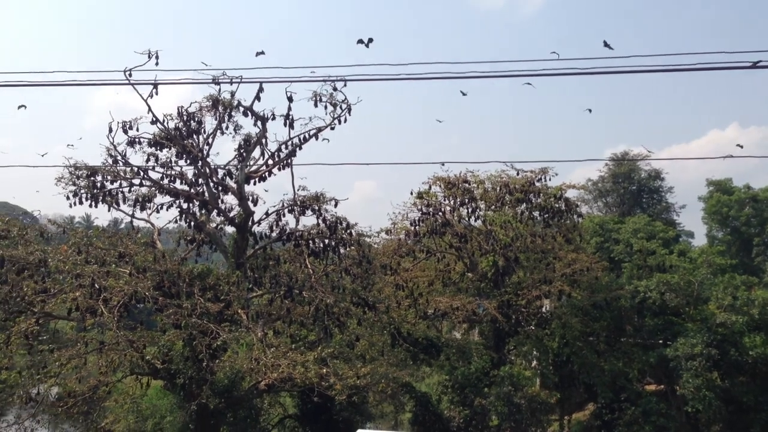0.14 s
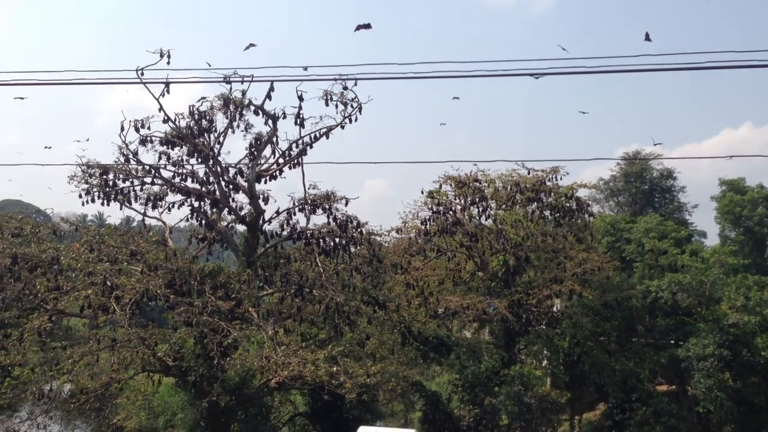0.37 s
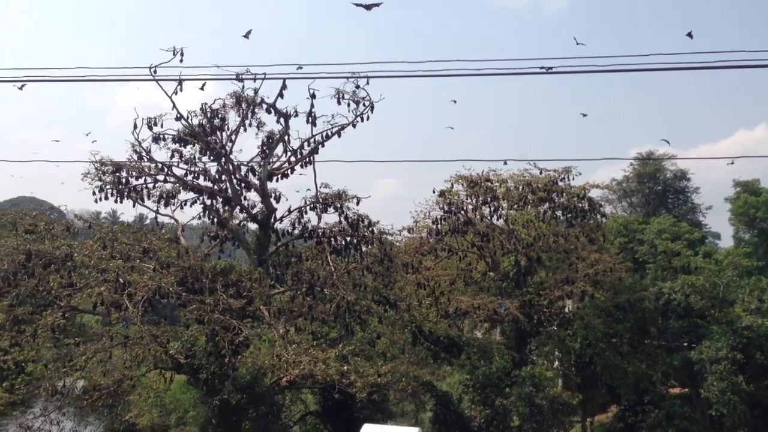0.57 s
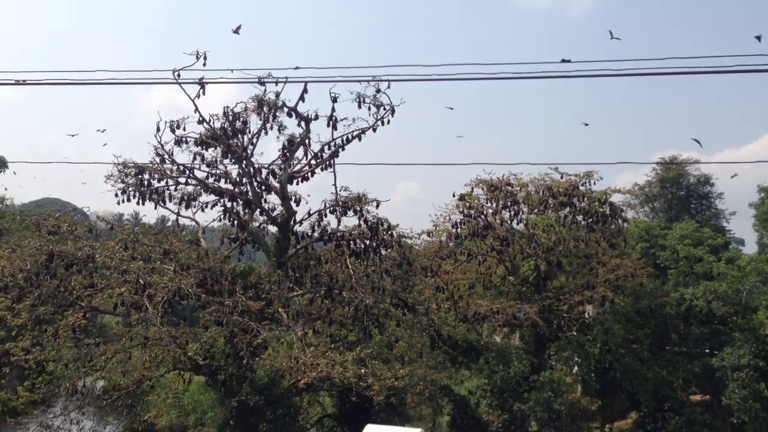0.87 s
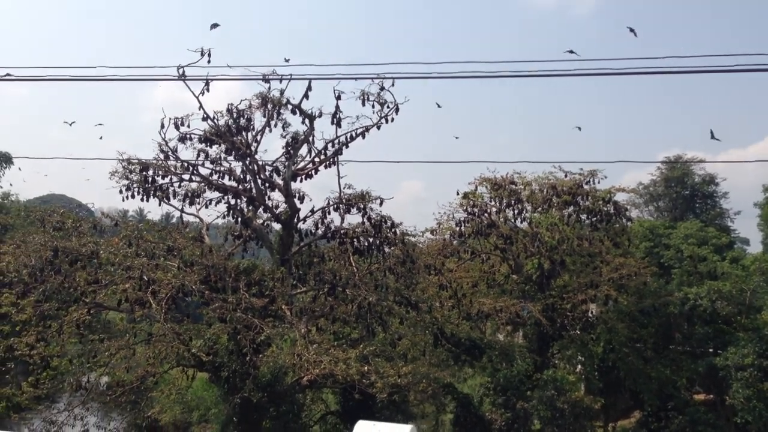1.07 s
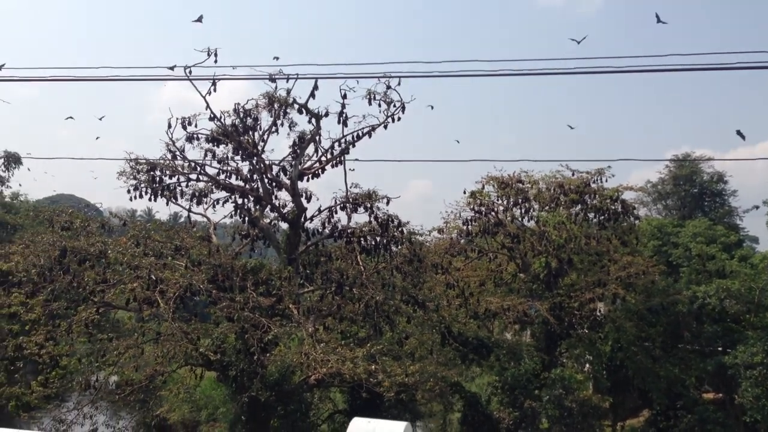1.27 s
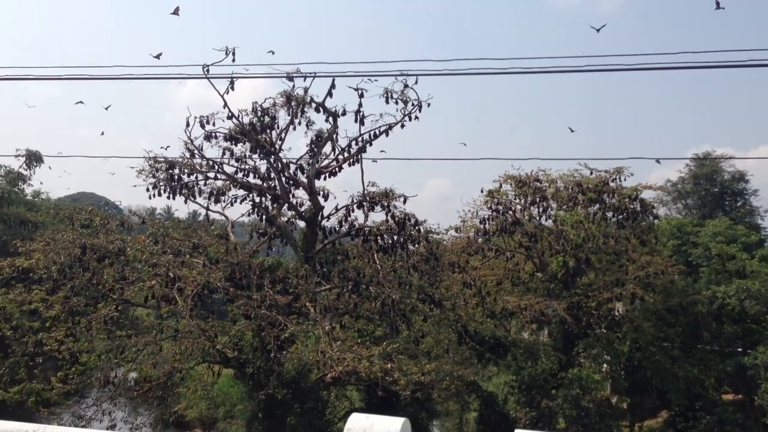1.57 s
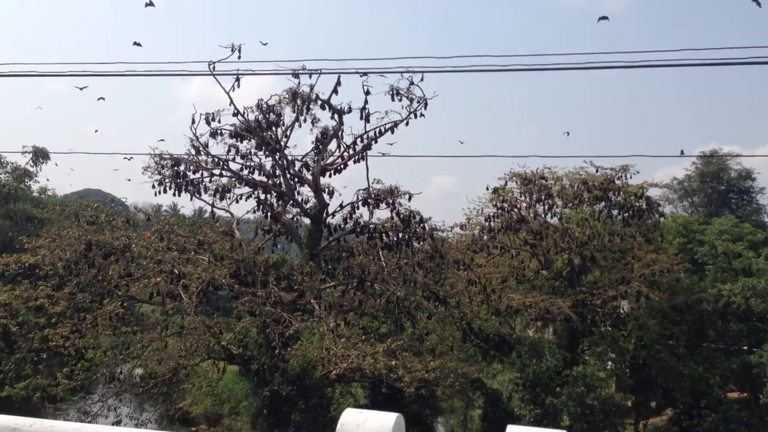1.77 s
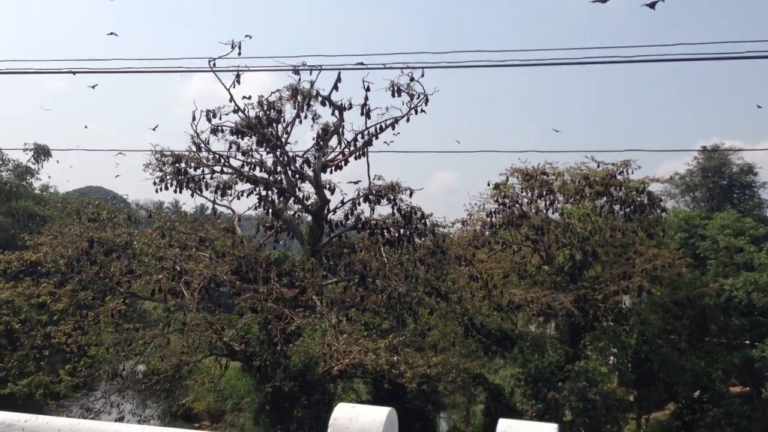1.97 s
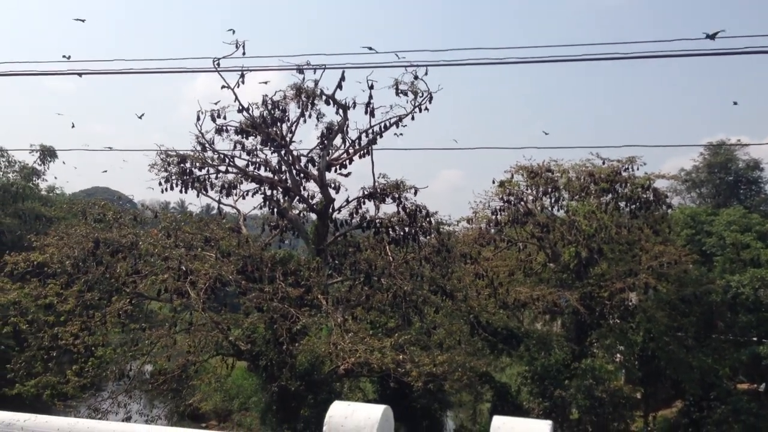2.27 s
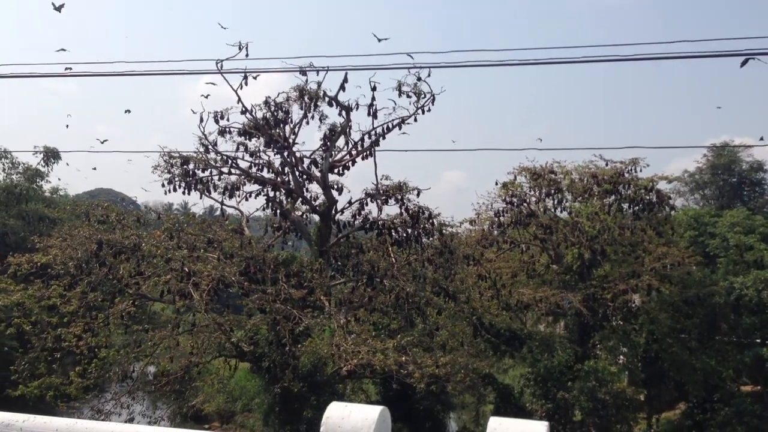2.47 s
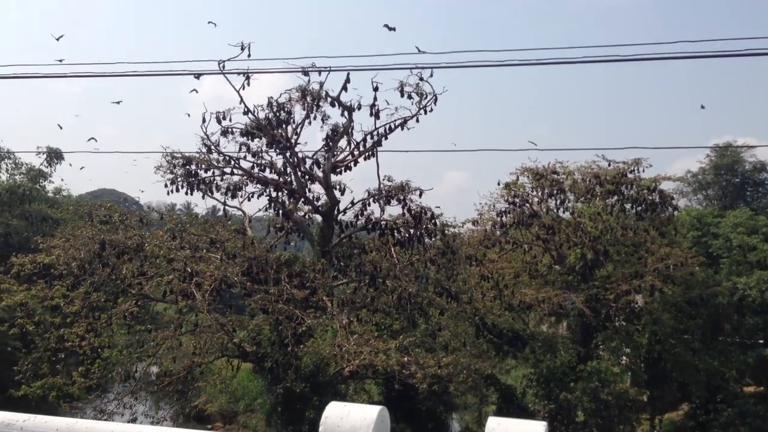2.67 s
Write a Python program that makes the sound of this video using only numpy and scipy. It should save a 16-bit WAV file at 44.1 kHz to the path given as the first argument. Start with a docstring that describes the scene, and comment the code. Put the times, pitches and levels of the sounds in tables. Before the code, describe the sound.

A large fruit bat colony chatters and screeches in trees over a low steady rumble

```python
"""Among distant trees, a large colony of fruit bats chatters over a low rumble of traffic or water.
Nearer bats stand out: harsh screeches stack shaky overtones with rasping noise; near squeals and strong
screech overtones are single gliding tones with weaker neighbours. Hundreds of far calls, made alike at
random times, merge with a wash of noise. The trees scatter the calls as a fading echo; the rumble is
shaped noise with surging bass. Everything is mono, the same in both channels."""
import sys
import numpy as np
from scipy import signal
from scipy.fft import rfft, irfft, next_fast_len
from scipy.io import wavfile
from scipy.ndimage import uniform_filter1d, map_coordinates

SR = 44100
rng = np.random.default_rng(int(sys.argv[2]) if len(sys.argv) > 2 else 0)


def generate_wav(signal):
    """Clip the signal to [-1, 1] and save it as 16-bit WAV at the path in sys.argv[1]."""
    frames = np.transpose(np.atleast_2d(signal))
    scaled = np.clip(frames, -1, 1) * 32767
    pcm = np.round(scaled).astype(np.int16)
    wavfile.write(sys.argv[1], SR, pcm)


N = 125244  # length of the scene in samples

# How the throat strengthens or weakens each overtone of a screech: f/Hz, level/dB
THROAT_SHAPE = [(900, -16), (1830, -28), (2720, 3), (3650, -17), (4650, -6), (5500, -20), (7300, -13)]


def overtones(phase, pitch, count):
    """A voice is a stack of whole-number multiples of its pitch, each weighted by the throat."""
    total = 0
    for k in np.arange(1, count + 1):
        total = total + amp(along(THROAT_SHAPE, k * pitch)) * np.sin(k * phase)
    return unit(total)


# Each screech before the trees: start t/s, length t/s, central pitch f/Hz, voice level/dB, rasp level/dB
SCREECH_CALLS = [(0.195, 0.11, 895, -57, -78), (0.345, 0.33, 890, -55, -55),
                 (0.867, 0.109, 813.7, -50.5, -47.5), (0.969, 0.2384, 886.3, -54, -46.5),
                 (1.203, 0.124, 896, -51.5, -47.5), (1.315, 0.1703, 910, -48.5, -47.5),
                 (1.562, 0.129, 904, -55.5, -72.5), (1.671, 0.1577, 914.6, -46.5, -46.5),
                 (1.815, 0.13, 929.5, -58.5, -51.5), (1.933, .112, 899, -60.5, -49.5),
                 (2.169, 0.1208, 900.4, -43, -47), (2.276, 0.147, 917, -46.5, -51.5),
                 (2.791, 0.03, 869, -55.5, -50)]
# Tone colour of the rasping breath: f/Hz, level/dB
RASP_SHAPE = [(1500, -46), (3000, -30.5), (5000, 1.5), (6000, 5), (7500, -1.5), (9500, -4), (13000, -10.5),
              (15000, -18)]


def screeches():
    """Quarrelling bats: a shaky voice with overtones comes in spurts, with a bright breathy rasp on top."""
    voice, breath = np.zeros(N), np.zeros(N)
    for start, length, pitch, voice_db, rasp_db in SCREECH_CALLS:
        env = envelope(length, flutter_db=2.5, flutter_rate=124.3)
        size = len(env)
        spurts = unit(amp(2.23 * wobble(55.6, size)))
        # The pitch trembles both very fast and more slowly
        hz = pitch * (1 + 0.04006 * wobble(1100, size) + 0.01735 * wobble(68.67, size))
        phase = 2 * np.pi * np.cumsum(hz) / SR
        add(voice, start, amp(voice_db) * env * spurts * overtones(phase, pitch, count=8))
        add(breath, start, amp(rasp_db) * envelope(length, flutter_db=0.5, flutter_rate=260))
    return voice + breath * coloured(patchy_noise(patchy_db=3.3), RASP_SHAPE)


# Near squeals, and single strong overtones of the harsh screeches, before the trees:
# start t/s, length t/s, first f/Hz, middle f/Hz, last f/Hz, level/dB, pitch jitter (share of the pitch)
STRONG_TONES = [(0.119, 0.048, 4297, 4600, 5000, -47.5, 0.037),
                (0.178, 0.071, 4000, 4250, 4410, -49, 0.021), (0.342, .045, 2753, 2690, 2699, -49.5, .016),
                (0.393, 0.0564, 4226, 3990, 3930, -49, 0.03),
                (0.422, 0.084, 2644, 2660, 2638, -45.5, 0.0103),
                (0.45, 0.0494, 4417, 4750, 4800, -45, .026), (0.497, 0.094, 4987, 5050, 4784, -46, 0.0434),
                (0.549, 0.165, 4228, 4260, 4019, -48.5, 0.0746),
                (0.862, 0.043, 2375, 2430, 2370, -48.5, .015),
                (0.957, 0.071, 4900, 5050, 5084, -46.5, 0.0283), (1.08, .12, 6060, 6120, 6200, -55, .025),
                (1.258, 0.051, 4200, 4280, 4127, -46.5, 0.06),
                (1.316, 0.144, 2693, 2684, 2749, -49.5, .028),
                (1.396, 0.0317, 4544, 4590, 4690, -47, 0.017), (1.402, 0.033, 1880, 1865, 1820, -43, .02),
                (1.37, 0.147, 2900, 3060, 3053, -49, 0.0366), (1.535, 0.065, 5000, 4890, 4750, -50, 0.0286),
                (1.623, 0.0414, 3208, 3420, 3260, -44, 0.015),
                (1.721, 0.226, 4993, 4980, 4930, -50.5, 0.0395),
                (1.803, 0.076, 3707, 3750, 3706, -47, 0.0635), (1.82, 0.04, 2712, 2790, 2805, -43, 0.0122),
                (1.806, 0.1155, 4614, 4650, 4696, -47, 0.058), (1.885, 0.0518, 2815, 2770, 2733, -47, .012),
                (1.974, 0.0485, 4530, 4700, 4830, -45, 0.054),
                (1.983, 0.0882, 2624, 2700, 2853, -46.5, 0.02),
                (2.166, 0.0469, 2609, 2700, 2734, -40.5, 0.021),
                (2.188, 0.204, 3691, 3650, 3700, -47.5, 0.065), (2.224, 0.062, 3579, 3660, 3608, -41, 0.02),
                (2.236, 0.077, 4520, 4604, 4650, -43.5, 0.0267),
                (2.496, 0.0802, 4950, 5080, 5124, -44.5, 0.027),
                (2.517, 0.115, 3020, 3250, 3349, -47.5, 0.049), (2.609, .1, 3380, 3370, 2992, -43.5, 0.018),
                (2.572, 0.143, 5217, 5200, 4938, -47, 0.084), (2.558, 0.177, 4113, 4250, 4519, -46, 0.103),
                (2.786, 0.0394, 3544, 3500, 3370, -43.5, 0.017)]


def squeals_and_strong_overtones():
    """Near squeals and strong screech overtones stand out over the crowd; more jitter sounds hoarser."""
    out = np.zeros(N)
    for start, length, first, middle, last, db, jitter in STRONG_TONES:
        tone = gliding_tone(length, first, middle, last, jitter, side_db=-20.0)
        add(out, start, amp(db) * tone)
    return out


def gliding_tone(length, first_hz, middle_hz, last_hz, jitter, side_db):
    """One strong, unsteady overtone glides along an arc, with weaker neighbours on both sides."""
    env = envelope(length, flutter_db=1.5, flutter_rate=177.3)
    progress = np.linspace(0, 1, len(env))
    arc = np.polyfit([0, .5, 1], [first_hz, middle_hz, last_hz], 2)
    hz = np.polyval(arc, progress) * (1 + jitter * wobble(1102, len(env)))
    phase = 2 * np.pi * np.cumsum(hz) / SR
    # The strong tone is overtone 4 of a low voice; these are overtones 3, 5 and 6
    neighbours = sum(np.sin(phase * k / 4) for k in (3, 5, 6))
    return env * unit(np.sin(phase) + amp(side_db) * neighbours)


ATTACK_S, RELEASE_S = 0.00612, 0.01784


def envelope(length, flutter_db, flutter_rate):
    """A call rises, holds and dies away, while the rough voice shakes its loudness."""
    t = np.arange(int(length * SR)) / SR
    rise = np.clip(t / ATTACK_S, 0, 1)
    fall = np.clip((length - t) / RELEASE_S, 0, 1)
    return rise * fall * unit(amp(flutter_db * wobble(flutter_rate, len(t))))


CALLS_PER_S = 120


def chorus():
    """Many short far squeaks overlap at random times, pitches and strengths."""
    out = np.zeros(N + SR // 2)  # starts early, so the crowd is already calling
    count = int(CALLS_PER_S * len(out) / SR)
    for when, span, height, glide, arch, strength in rng.random((count, 6)):
        length = 0.02668 + 0.05945 * span
        hz = 1300 * 4.6 ** height
        slope = 0.12085 * (glide - .5)  # rising or falling
        first, middle, last = hz * (1 - slope), hz * (1 + 0.0403 * arch), hz * (1 + slope)
        call = gliding_tone(length, first, middle, last, jitter=0.0266, side_db=-5)
        add(out, when * len(out) / SR, amp(4.38 * strength) * np.sqrt(hz) * call)
    return out[-N:]


# Tone colour of the far colony: f/Hz, level/dB (per Hz, relative)
COLONY_SHAPE = [(530, -31), (1120, -11.5), (1270, -1), (1650, -6), (1930, -3), (2120, -8.5), (2690, -3.5),
                (3030, -5), (4160, -5), (4950, -5), (5800, -11), (7300, -14), (9500, -19.5), (10700, -24),
                (13000, -28.5), (15000, -34)]
# How busy the colony sounds over time: t/s, level/dB
COLONY_ACTIVITY = [(0, -40.5), (.25, -41.5), (.55, -42), (1.55, -41.5), (1.82, -41.5), (2.46, -41),
                   (2.64, -40.5), (2.76, -41.5), (2.84, -39.5)]
CHORUS_DB, WASH_DB = -6, -3  # balance between the two, before the overall level


def colony(low_hz=1150):
    """Far calls and the noisy wash of still farther ones swell together, with the low tones cut."""
    calls = coloured(trees(chorus()), COLONY_SHAPE)
    wash = coloured(patchy_noise(patchy_db=1.56), COLONY_SHAPE)
    crowd = amp(CHORUS_DB) * calls + amp(WASH_DB) * wash
    crowd = filtered(crowd, lambda hz: (hz / low_hz) ** 4 / np.sqrt(1 + (hz / low_hz) ** 8))
    return amp(curve(COLONY_ACTIVITY)) * unit(crowd)


# How long the trees' echo takes to fade by 60 dB at each frequency: f/Hz, fade t/s
TREE_FADE = [(500, 0.413), (3000, 0.234), (12000, 0.188)]
DIRECT_DB, ECHO_DB = -1, -8.5


def trees(x):
    """Trunks and leaves scatter sound into a noisy tail that fades at its own pace in each band."""
    hz, t, z = signal.stft(rng.standard_normal(SR // 2), SR, nperseg=256)
    fade = amp(-60 * t / along(TREE_FADE, hz)[:, None])
    tail = signal.istft(z * fade, SR, nperseg=256)[1]
    echo = signal.fftconvolve(x, tail / np.linalg.norm(tail))[:N]
    return amp(DIRECT_DB) * x + amp(ECHO_DB) * echo


# Tone colour of the rumble: f/Hz, level/dB (per Hz, relative)
RUMBLE_SHAPE = [(25, -31.5), (45, -29), (80, -19), (120, -10), (165, -2), (215, -2), (260, -6), (400, -11),
                (700, -14.5), (1100, -18.5), (2500, -27.5), (9000, -75.5)]
# Gain of the rumble's bass over time: t/s, level/dB
BASS_LEVEL = [(0, -43), (.38, -43.5), (.49, -40.5), (.55, -45.5), (.68, -43.5), (1.25, -44), (1.62, -44.5),
              (1.85, -41.5), (2.17, -40), (2.34, -42.5), (2.55, -42.5), (2.73, -40), (2.84, -43)]
STEADY_DB, SURGE_BELOW_HZ = -43.5, 333


def rumble():
    """Distant traffic or water as shaped noise: its bass surges while the roar above stays steady."""
    roar = coloured(rng.standard_normal(N), RUMBLE_SHAPE)
    bass = filtered(roar, lambda hz: 1 / (1 + (hz / SURGE_BELOW_HZ) ** 4))
    return amp(curve(BASS_LEVEL)) * bass + amp(STEADY_DB) * (roar - bass)


def patchy_noise(patchy_db):
    """Noise whose loudness varies in brief random patches of time and frequency."""
    z = signal.stft(rng.standard_normal(N), nperseg=512)[2]
    field = uniform_filter1d(rng.standard_normal(z.shape), size=4, axis=0)  # smooth over frequency
    field = uniform_filter1d(field, size=9, axis=1)  # smooth over time
    return signal.istft(z * amp(patchy_db * unit(field)), nperseg=512)[1][:N]


def wobble(rate, size=N):
    """A smooth random curve with rate random points a second."""
    knots = rng.standard_normal(4096)
    return map_coordinates(knots, [np.arange(size) * rate / SR], mode="wrap")


def coloured(x, spectrum):
    """Filter x by a table of tone colour, then bring it to rms 1."""
    return unit(filtered(x, lambda hz: amp(along(spectrum, hz))))


def filtered(x, response):
    """Multiply each frequency in x by its gain."""
    m = next_fast_len(N + SR // 2)  # spare room keeps the end from wrapping onto the start
    gain = response(np.fft.rfftfreq(m, 1 / SR))
    return irfft(rfft(x, m) * gain, m)[..., :N]


def along(points, hz):
    """Read between (f/Hz, value) points, with frequency on a log scale."""
    f, v = np.transpose(points)
    return np.interp(np.log(hz + 1), np.log(f + 1), v)


def curve(rows):
    """Read between (t/s, value) points, giving one value per sample."""
    return np.interp(np.arange(N) / SR, *np.transpose(rows))


def add(track, start, sound):
    """Mix a sound into a track at a start time in seconds."""
    part = track[max(0, round(start * SR)):][:len(sound)]
    part += sound[:len(part)]


def amp(db):
    """Turn decibels into a gain."""
    return 10 ** (np.asarray(db) / 20)


def unit(x):
    """Scale to an average strength (rms) of 1."""
    return x / np.sqrt(np.mean(x ** 2) + 1e-20)


def scene():
    """Near bats among the trees, the far colony and the rumble, alike in both channels."""
    near_bats = trees(screeches() + squeals_and_strong_overtones())
    mono = near_bats + colony() + rumble()
    return np.array([mono, mono])


TOP_HZ = 15300


def record(dry):
    """The microphone keeps nothing from its upper band limit upwards."""
    return filtered(dry, lambda hz: hz < TOP_HZ)


dry = scene()
out = record(dry)
generate_wav(out)
```